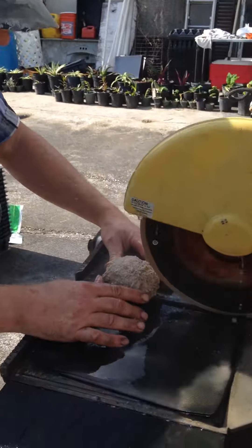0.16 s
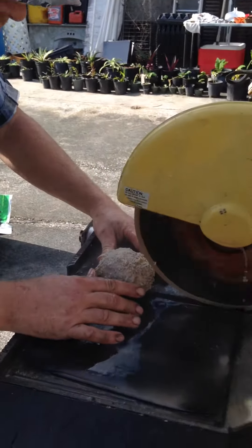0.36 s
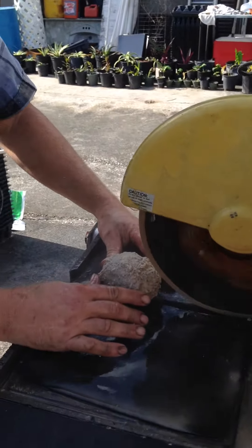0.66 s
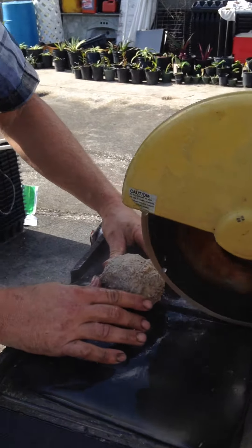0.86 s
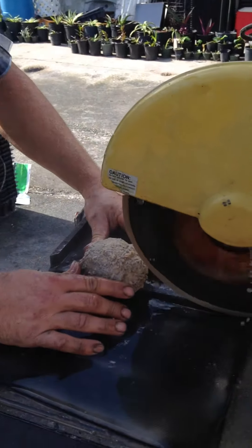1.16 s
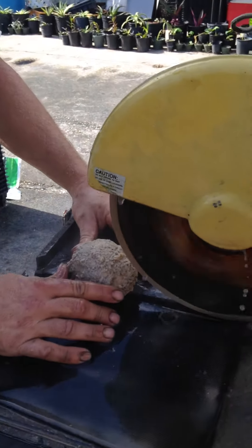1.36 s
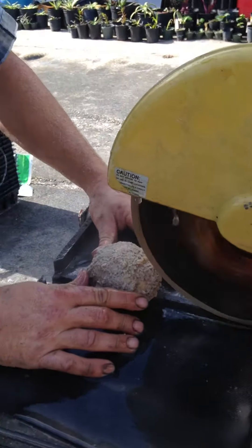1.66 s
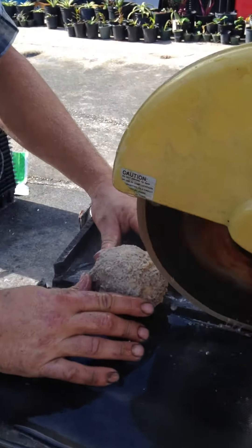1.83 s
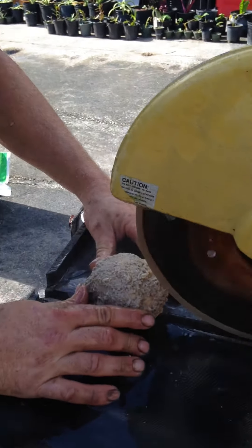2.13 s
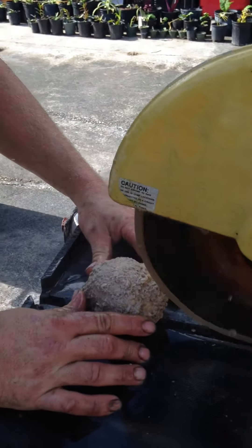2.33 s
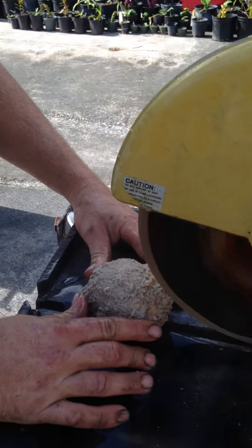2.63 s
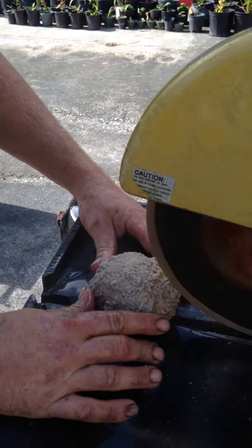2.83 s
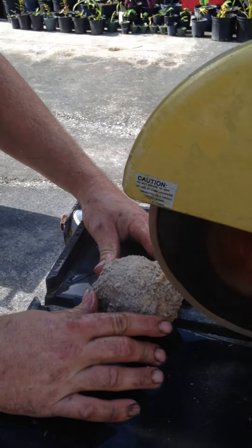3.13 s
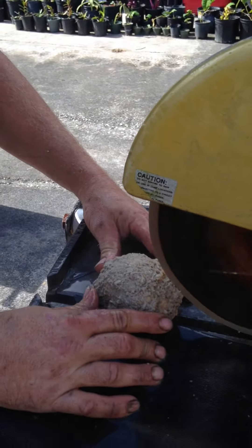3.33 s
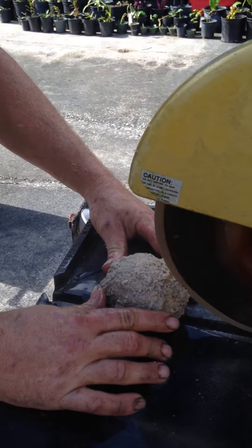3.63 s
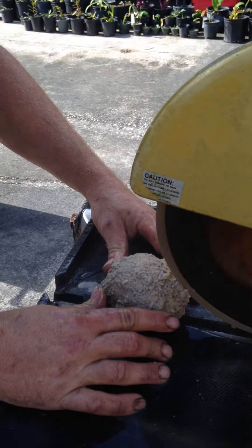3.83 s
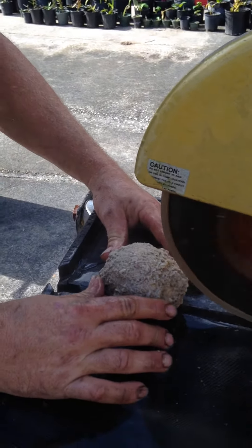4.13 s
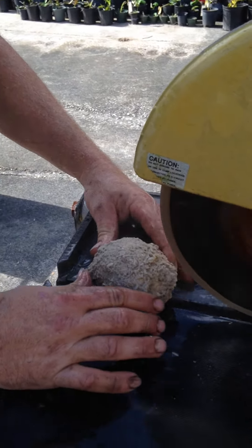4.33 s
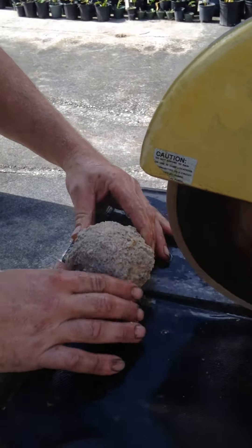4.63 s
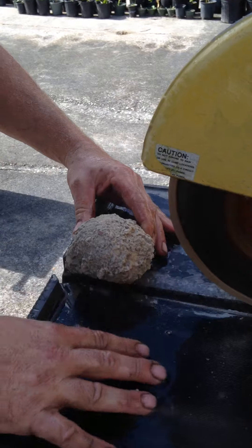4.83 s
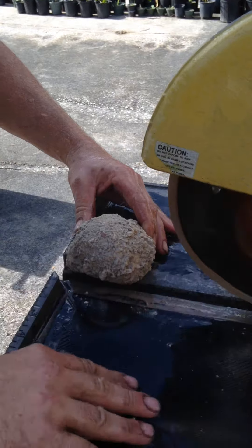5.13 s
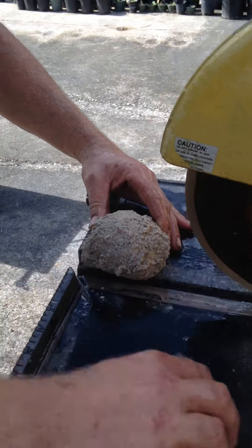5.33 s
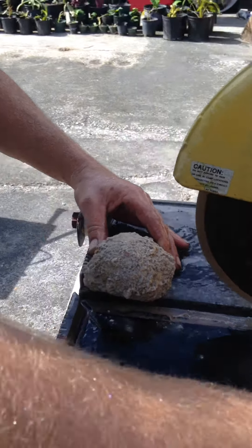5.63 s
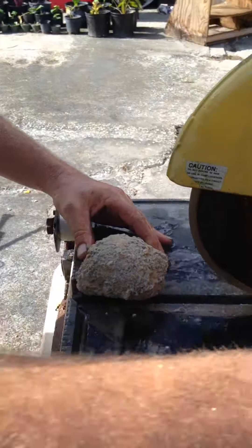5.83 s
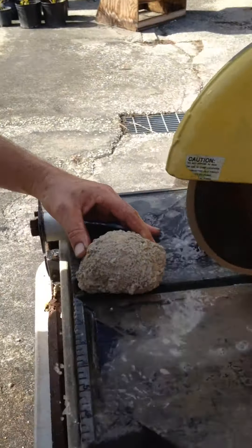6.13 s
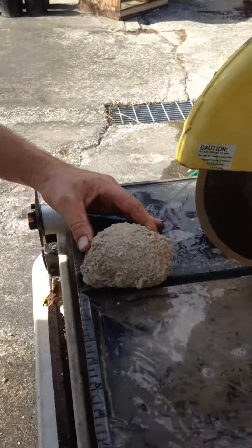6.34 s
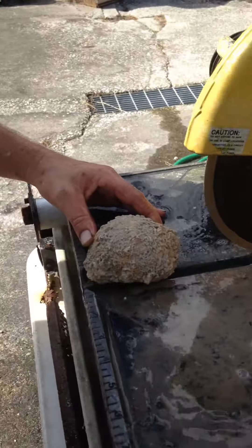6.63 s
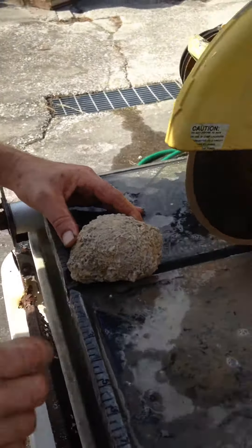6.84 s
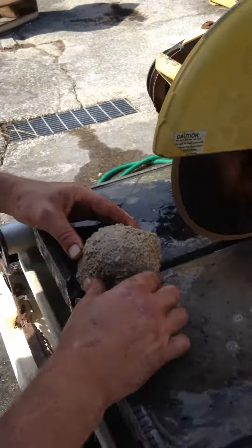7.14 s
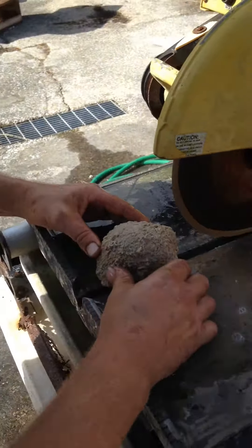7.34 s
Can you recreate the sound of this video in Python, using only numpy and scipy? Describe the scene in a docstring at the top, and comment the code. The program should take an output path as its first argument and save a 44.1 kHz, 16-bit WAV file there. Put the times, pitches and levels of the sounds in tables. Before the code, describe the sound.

Loud ringing saw whine with motor hum and water hiss; a gritty high grinding squeal in the middle, then a few soft tray knocks.

```python
"""From the start a wet tile saw runs outdoors: motor and spray shake guard and frame into narrow ringing
modes (driven resonance), one mode whines, spray hisses (coloured noise) and the motor hums and rumbles.
From 2.27 to 4 s a stony shell grazes the blade rim, which rasps and squeals high (frictional excitation).
Soft knocks on the tray (damped tones) follow from 3.28 s. Throughout, a hand-held microphone drifts round
the saw (directivity) and its gain control partly evens out the level."""
import sys
import numpy as np
from scipy import signal
from scipy.fft import rfft, irfft, next_fast_len
from scipy.io import wavfile
from scipy.ndimage import uniform_filter1d

SR = 44100
rng = np.random.default_rng(int(sys.argv[2]) if len(sys.argv) > 2 else 0)


def waveform_to_disk(signal):
    """Save audio, clipped to [-1, 1], as 16-bit WAV at the path in sys.argv[1]."""
    frames = np.transpose(np.atleast_2d(signal))
    scaled = np.clip(frames, -1, 1) * 32767
    samples = np.round(scaled).astype(np.int16)
    wavfile.write(sys.argv[1], SR, samples)


N = 330309  # samples
LEAD = 8000  # samples of run-in, so that resonances are already ringing at the start
TURNS_PER_S = 37.2  # blade rotation


def from_db(db):
    """Logarithmic level: 20 dB is a factor of ten in amplitude."""
    return 10 ** (np.asarray(db) / 20)


def rms_one(x):
    """Power normalisation: scale to rms 1."""
    return x / np.sqrt(np.mean(x ** 2) + 1e-20)


def in_time(rows):
    """Linear interpolation: turn the columns after the time into per-sample curves."""
    times, *columns = np.transpose(rows)
    return [np.interp(np.arange(N) / SR, times, column) for column in columns]


def coloured(spectrum, ripple_db=0, ripple_hz=12):
    """Spectral shaping of noise to rms 1; a random ripple stands for crowded weak modes."""
    size = next_fast_len(N)
    hz, db = np.transpose(spectrum)
    log_hz = np.log(np.arange(1, size // 2 + 2) * SR / size)
    span = int(ripple_hz * size / SR)
    ripple = rng.standard_normal(len(log_hz))
    ripple = rms_one(uniform_filter1d(uniform_filter1d(ripple, span), span))
    gain = from_db(np.interp(log_hz, np.log(hz), db) + ripple_db * ripple)
    white = rng.standard_normal(size)
    return rms_one(irfft(rfft(white) * gain, size)[:N])


def drift(rate):
    """Low-passed random process: a slow fluctuation of rms 1, faster for a higher rate [Hz]."""
    step = 40  # samples between computed points
    r = np.exp(-2 * step * np.pi * rate / SR)
    white = rng.standard_normal(N // step + 2002)
    slow = signal.lfilter([1], [1, -2 * r, r * r], white)[2000:]
    return np.interp(np.arange(N) / step, np.arange(len(slow)), rms_one(slow))


def forces(envelope, count=5):
    """Incoherent excitation: unrelated random forces under one envelope, with a run-in."""
    return rng.standard_normal((count, N + LEAD)) * np.pad(envelope, (LEAD, 0), "edge")


def mode(push, hz, width_hz):
    """Driven resonance: a two-pole resonator shaken by a random force, scaled to rms 1."""
    r = np.exp(-np.pi * max(width_hz, 2) / SR)
    ringing = signal.lfilter([1, 0, -1], [1, -2 * r * np.cos(2 * np.pi * hz / SR), r * r], push)
    return rms_one(ringing[LEAD:])


def tone(hz, wander_hz, rate=3.77):
    """Frequency modulation: a sine of rms 1 whose pitch wanders by wander_hz rms."""
    phase = 2 * np.pi * np.cumsum(hz + wander_hz * drift(rate)) / SR
    return np.sqrt(2) * np.sin(phase)


# guard modes: (frequency [Hz], width [Hz])
GUARD_MODES = [(544, 6), (580, 12), (630, 20), (684, 7), (727, 5), (750, 8), (775, 10), (807, 5), (872, 7),
               (910, 12), (991, 16), (1050, 6), (1077, 6), (1125, 6), (1217, 7), (1270, 6), (1353, 11),
               (1416, 6), (1506, 11), (1527, 11), (1599, 8), (1658, 14), (4010, 50), (4870, 60), (5000, 70),
               (5170, 50), (5310, 50)]
# guard levels, row for row: (level [dB], change in side view [dB], change in front view [dB])
GUARD_LEVELS = [(-63, -10, 2), (-30.5, -1, -4), (-26, -0.5, -15.5), (-35, 2, -17), (-40.5, 7, -3),
                (-37, 3.5, -1), (-31, 4, -3), (-34, -2.5, -3), (-37.5, -2, -8), (-34.5, -2.5, -4),
                (-36.5, -3, 9), (-32, -3.5, 2), (-32.5, -3.5, -2), (-28.5, -3, -5), (-36.5, -0.5, 2.5),
                (-34, 0, -2.5), (-29, -3, -9), (-47.5, -14, 8), (-24.5, -4, -20), (-24, -7, -10.5),
                (-29, -7, -9.5), (-28, -3.5, -10), (-35.5, -0.5, 3), (-41.5, -6.5, 7.5), (-45, -4, 10),
                (-39, 3.5, 1), (-39, -25, 5.5)]
# frame modes: (frequency [Hz], width [Hz])
FRAME_MODES = [(1780, 7), (1836, 14), (1961, 8), (1992, 12), (2035, 6), (2078, 6), (2116, 8), (2144, 7),
               (2180, 6), (2220, 8), (2264, 10), (2293, 8), (2326, 6), (2399, 9), (2419, 10), (2509, 7),
               (2600, 14), (2650, 20), (2720, 14), (2762, 7), (2875, 17), (2905, 10), (3058, 25), (3101, 7),
               (3176, 16), (3345, 30), (3435, 10), (3495, 35)]
# frame levels, row for row: (level [dB], change in side view [dB], change in front view [dB])
FRAME_LEVELS = [(-37.5, 4.5, 4), (-36, 3, 11.5), (-36, 1, 7), (-38, 9.5, 15.5), (-35.5, 6, 7),
                (-35, 2.5, -6), (-29, -4.5, 6.5), (-31.5, -2.5, 13.5), (-43.5, 15, 3), (-50, 15, -3),
                (-35, -1, -5), (-44.5, 7, 3), (-53, 10, 1), (-27, -6, 7), (-22.5, -4, -10), (-43, 12.5, -8),
                (-43.5, 7, 5), (-49.5, 17, 11), (-40, 1, 13.5), (-34.5, -0.5, -8), (-30, -18, -15),
                (-44.5, 7, 1), (-39.5, 6, 6.5), (-40.5, 2, -1), (-38.5, 7, -0.5), (-43, 2, 7),
                (-51.5, 2, 14), (-37, 3.5, 4.5)]
# relative spectrum of the dense weak modes: (frequency [Hz], level per Hz [dB])
WEAK_MODE_SPECTRUM = [(280, -53), (480, -58), (606, 5), (858, -32), (1110, -1), (1200, -12.5), (2270, -8.5),
                      (2370, -4), (2600, -13.5), (4230, -20), (6000, -43), (7800, -54), (13200, -120)]
# a broad ring in two lobes: (frequency [Hz], width [Hz])
RING_LOBES = [(4260, 130), (4600, 150)]
# the lobes trade strength as the microphone moves: (time [s], lower lobe [dB], upper lobe [dB])
RING_LEVELS = [(.3, -23, -42), (1.5, -33, -32), (1.9, -29, -29), (2.7, -24, -56.5), (4.0, -27, -47),
               (4.9, -26.5, -69), (5.7, -32, -38), (6.15, -30.5, -31.5), (6.4, -25.5, -44),
               (7.2, -24.5, -37)]


def body(side, front, roar_db=-23.5, low_edge_hz=520):
    """Modal superposition: guard and frame modes, each with its own directivity to the microphone."""
    roar_force = from_db(.7 * drift(9))
    # five random forces, each with its own flutter, shared in turn among the modes
    pushes = [forces(from_db(1.5 * drift(7)), count=1)[0] for _ in range(5)]
    out = from_db(roar_db) * roar_force * coloured(WEAK_MODE_SPECTRUM, ripple_db=5)
    modes = zip(GUARD_MODES + FRAME_MODES, GUARD_LEVELS + FRAME_LEVELS)
    for k, ((hz, width), (db, side_db, front_db)) in enumerate(modes):
        heard_db = db + side * side_db + front * front_db
        out = out + from_db(heard_db) * mode(pushes[k % len(pushes)], hz, width)
    for push, (hz, width), db in zip(pushes, RING_LOBES, in_time(RING_LEVELS)):
        out = out + from_db(db) * mode(push, hz, width)
    # small panels radiate poorly below their first modes
    return signal.sosfilt(signal.butter(6, low_edge_hz, "high", fs=SR, output="sos"), out)


# level of the whine, swelling and fading unevenly; faster flutter is added: (time [s], level [dB])
WHINE_LEVEL = [(0, -25.5), (.7, -24.5), (.92, -15), (1.1, -21), (1.28, -10.5), (1.55, -30), (1.95, -19),
               (2.3, -27.5), (2.9, -21), (3.3, -18.5), (3.55, -28), (4.4, -16.5), (5.0, -25), (5.21, -12),
               (5.33, -28), (5.42, -19.5), (5.62, -29.5), (5.88, -15), (6.45, -27), (6.66, -16.5),
               (6.78, -33.5), (7.49, -25.5)]


def whine(hz=608.4, wander_hz=1.972, flutter_db=3.5, flutter_rate_hz=5.7, partner_db=-14.5):
    """Rotational sideband: a nearly clean mode and a weaker partner two turning rates higher."""
    level = from_db(in_time(WHINE_LEVEL)[0] + flutter_db * drift(flutter_rate_hz))
    partner = from_db(partner_db) * tone(hz + 2 * TURNS_PER_S, wander_hz)
    return level * (tone(hz, wander_hz) + partner)  # both swell in step


# relative spectrum of the spray: (frequency [Hz], level per Hz [dB])
SPRAY_SPECTRUM = [(2940, -11), (5000, 3), (5360, -14), (5590, -7), (6240, -2.5), (8790, -11), (12800, -28),
                  (15100, -23)]
# faint blade hood modes, heard from the side: (frequency [Hz], width [Hz], level re hiss [dB])
HOOD_MODES = [(6850, 300, -18), (7390, 78, -17), (9100, 250, -16), (9900, 200, -17)]


def spray(level_db, side):
    """Broadband noise and forced resonance: thrown water hisses and drums on the hood."""
    push = forces(np.ones(N), count=1)[0]
    hood = side * sum(from_db(db) * mode(push, hz, width) for hz, width, db in HOOD_MODES)
    return from_db(level_db + .6 * drift(8)) * (coloured(SPRAY_SPECTRUM) + hood)


# motor magnetics: (frequency [Hz], relative level [dB])
HUM_HARMONICS = [(120, -53), (240, -53.5), (360, -57)]
# common gain of the hum: (time [s], gain [dB])
HUM_GAIN = [(0, 3), (1.0, 6), (2.7, 4.5), (3.1, 1.5), (3.5, 4), (3.7, -2), (4.1, 3.5), (5.2, -4.5),
            (5.7, 1), (6.6, -6), (7.1, -3)]
# relative spectrum of the rumble: (frequency [Hz], level per Hz [dB])
RUMBLE_SPECTRUM = [(13, -59), (22, -34), (129, -4.5), (193, -8), (242, -22), (308, -11.5), (492, -1),
                   (540, -26.5), (700, -11), (1190, -120)]


def motor(waver_db=1.5, rumble_db=-45.5, lumpy_db=2.0):
    """Harmonic magnetic hum of wavering level over a lumpy low rumble of shaped noise."""
    t = np.arange(N) / SR
    hum = 0
    for hz, db in HUM_HARMONICS:
        level = from_db(db + waver_db * drift(2.0))
        hum = hum + np.sqrt(2) * level * np.sin(2 * np.pi * hz * t)
    rumble = from_db(rumble_db + lumpy_db * drift(1.5)) * coloured(RUMBLE_SPECTRUM)
    return from_db(in_time(HUM_GAIN)[0]) * hum + rumble


# blade modes under the cut: (frequency [Hz], width [Hz], relative level [dB])
BLADE_MODES = [(4694, 16, -37), (4856, 7, -34), (5265, 19, -40), (5448, 9, -31), (5566, 16, -36),
               (6008, 13, -39), (6342, 19, -40), (6858, 20, -43), (7084, 14, -37), (7407, 31, -45),
               (7773, 11, -35), (8021, 35, -44), (8215, 15, -36), (8506, 31, -39), (8742, 43, -40),
               (9076, 36, -40), (9399, 77, -43), (9851, 22, -41), (9959, 35, -41), (10885, 43, -41),
               (11423, 53, -42), (11940, 42, -42), (12263, 34, -43), (12446, 26, -47), (13038, 22, -46),
               (13329, 17, -46), (13577, 39, -46), (14158, 26, -43), (14406, 22, -46), (14944, 21, -44)]
# the shell pressing on the rim: (time [s], rasp level [dB], squeal level of the low blade modes [dB])
CUT_PRESSURE = [(2.27, -44, -47), (2.32, -32.5, -42), (2.55, -37, -34), (2.65, -28.5, -36),
                (2.72, -33.5, -30), (2.93, -30.5, -33), (2.98, -28.5, -35), (3.19, -23.5, -20),
                (3.31, -25.5, -30), (3.43, -32, -38), (3.52, -27, -31), (3.66, -11.5, -21.5),
                (3.77, -16.5, -25), (3.83, -30.5, -28), (3.9, -28.5, -30), (4.0, -36, -36)]
# relative spectrum of the grit hiss: (frequency [Hz], level per Hz [dB])
GRIT_SPECTRUM = [(3240, -36), (5500, 7), (7420, 9.5), (8500, -6), (10400, -3), (11600, 6), (14100, -13),
                 (15100, -50)]


def cutting(wobble_db=2.0, oval_db=3.5, bite_db=2.5, minor_db=-46, shift_db=3.0,
            grit_db=-7, squeal_db=1.5, snag_db=1.5, low_below_hz=7300, touch_s=0.022):
    """Frictional excitation: an untrue rim bites once and twice a turn; grit hisses, the disc rings."""
    t = np.arange(N) / SR
    rasp_db, ring_db = in_time(CUT_PRESSURE)
    # the rim meets and leaves the shell within touch_s
    start, end = CUT_PRESSURE[0][0], CUT_PRESSURE[-1][0]
    touch = np.clip(np.minimum(t - start, end - t) / touch_s, 0, 1)
    turn = 2 * np.pi * TURNS_PER_S * t
    runout_db = wobble_db * np.cos(turn) + oval_db * np.cos(2 * turn + 0.34)
    bite = from_db(runout_db + bite_db * drift(26))

    # the low modes lock to the rub and squeal as nearly clean tones
    squeal = sum(from_db(db + squeal_db * drift(9.9)) * tone(hz, 0.405 * width, rate=14.3)
                 for hz, width, db in BLADE_MODES if hz < low_below_hz)

    # weaker modes, 25 Hz wide, crowd between the strong ones
    minor = [(hz, 25.0, minor_db) for hz in rng.uniform(6200, 15200, size=30)]
    crowd = [row for row in BLADE_MODES if row[0] >= low_below_hz] + minor
    pushes = forces(bite)
    high = 0
    # the shifting contact favours now one group of modes, now another
    for k, push in enumerate(pushes):
        group = sum(from_db(db) * mode(push, hz, width) for hz, width, db in crowd[k::len(pushes)])
        high = high + from_db(shift_db * drift(5)) * group

    hiss = rms_one(bite * coloured(GRIT_SPECTRUM, ripple_db=5, ripple_hz=40))
    rasp = rms_one(rms_one(high) + from_db(grit_db) * hiss)
    rasp_level = from_db(rasp_db + snag_db * drift(22.0))
    return touch * (from_db(ring_db) * rms_one(squeal) + rasp_level * rasp)


# soft knocks on the tray: (time [s], level before decay [dB], frequency [Hz], 60 dB decay time [s])
TRAY_KNOCKS = [(4.855, -17, 225, .09), (4.89, -32, 95, .08), (5.15, -31, 80, .25), (6.755, -24, 400, .03),
               (6.77, -25, 280, .04), (3.28, -32, 55, .1)]


def knocks(rise_s=.004):
    """Free damped vibration: each knock is a dull decaying tone with a soft start."""
    out = 0
    for start, db, hz, t60 in TRAY_KNOCKS:
        t = np.maximum(np.arange(N) / SR - start, 0)
        decay = from_db(db - 60 * t / t60)
        out = out + decay * np.tanh(t / rise_s) * np.sin(2 * np.pi * hz * t)
    return out


# microphone position: (time [s], share of side view [0-1], share of front view [0-1], spray level [dB])
MICROPHONE_VIEW = [(0, 0.92, 0.18, -33), (1.1, 0.98, 0.01, -29.5), (1.7, 0.73, 0.0, -31.5),
                   (2.4, 0, 0.07, -32.5), (4.0, 0.0, 0.0, -33.5), (4.8, 0.02, 0.13, -30),
                   (5.8, 0.17, 0.17, -32), (6.2, 0.34, 0.62, -34), (6.5, 0, 0.86, -36),
                   (7.49, 0.07, 0.66, -37)]


def scene():
    """Linear superposition: all sources add at the moving microphone."""
    side, front, spray_db = in_time(MICROPHONE_VIEW)
    saw = body(side, front) + whine() + spray(spray_db, side) + motor()
    return (saw + cutting() + knocks())[None]


def record(dry, hold_db=-14, share=0.31, window_s=0.22, treble_db=8, cutoff_hz=15260):
    """Level compression and band limiting: treble-weighted gain control, soft peaks, steep top cut."""
    treble = signal.sosfilt(signal.butter(2, 7000, "high", fs=SR, output="sos"), dry)
    weighted = dry + from_db(treble_db) * treble
    power = uniform_filter1d(weighted ** 2, int(window_s * SR))
    level_db = 10 * np.log10(power + 1e-12)
    # the capsule drops deep bass
    capsule = signal.sosfilt(signal.butter(2, 45, "high", fs=SR, output="sos"), dry)
    held = capsule * from_db(share * (hold_db - level_db))  # only this share of the deviation is corrected
    top_cut = signal.ellip(14, .5, 100, cutoff_hz, fs=SR, output="sos")
    return signal.sosfilt(top_cut, np.tanh(held))


dry = scene()
out = record(dry)
waveform_to_disk(out)
```